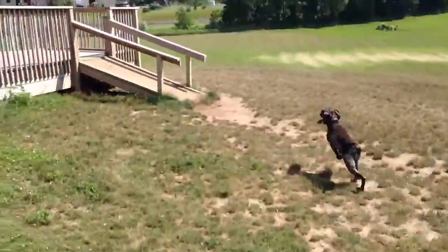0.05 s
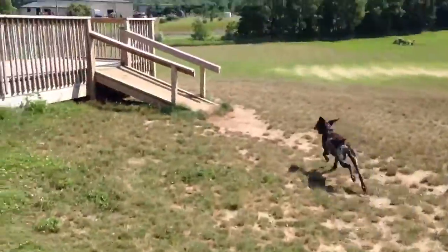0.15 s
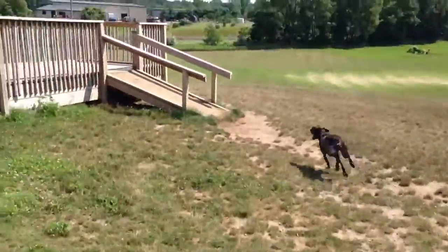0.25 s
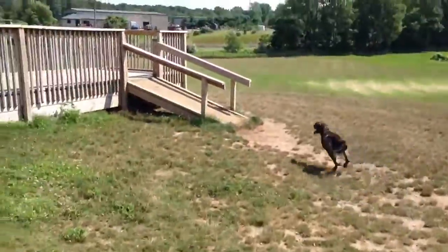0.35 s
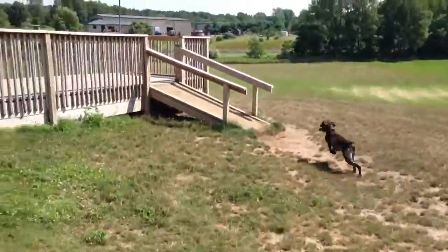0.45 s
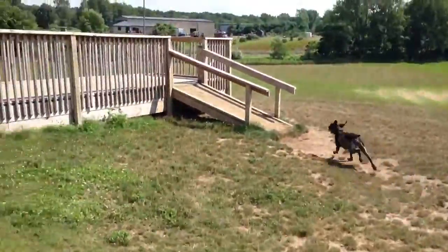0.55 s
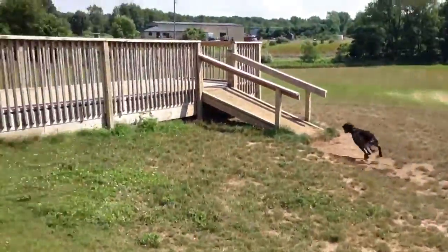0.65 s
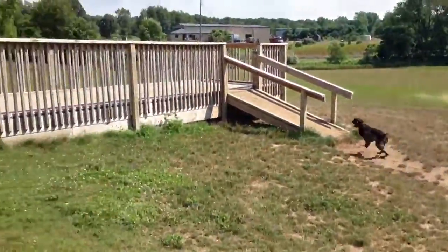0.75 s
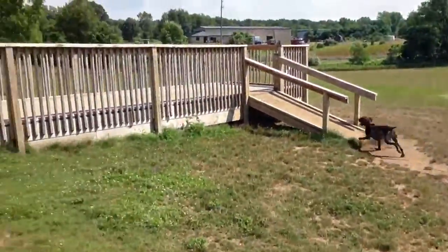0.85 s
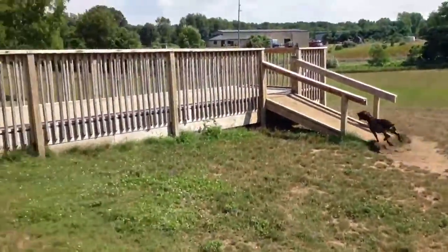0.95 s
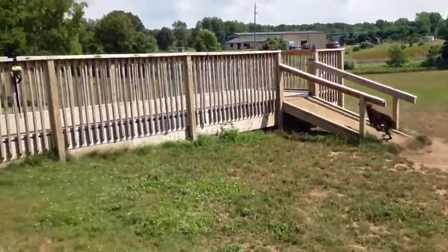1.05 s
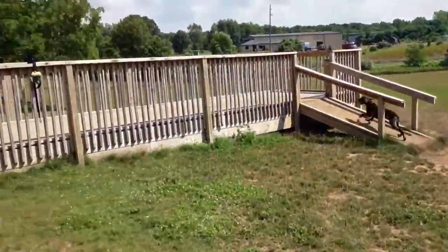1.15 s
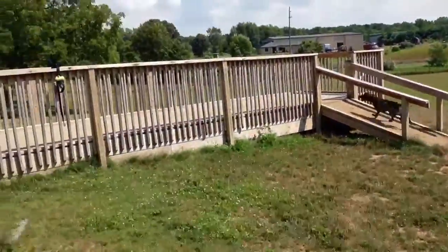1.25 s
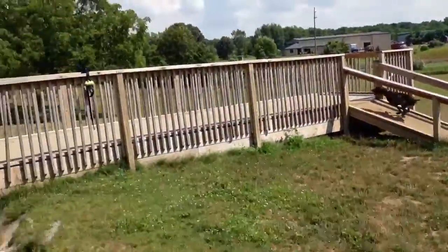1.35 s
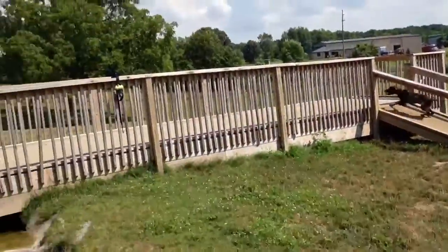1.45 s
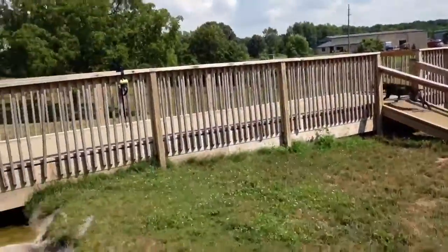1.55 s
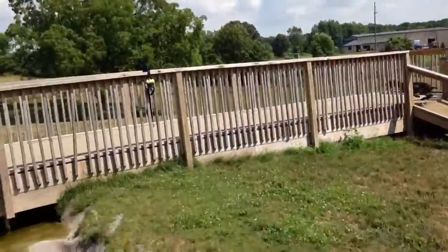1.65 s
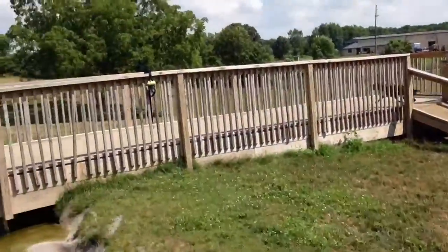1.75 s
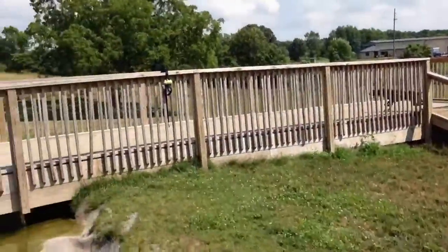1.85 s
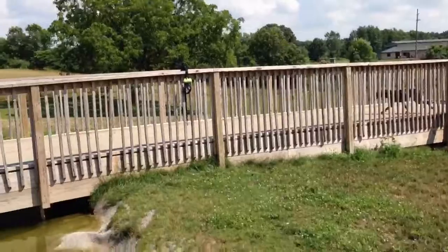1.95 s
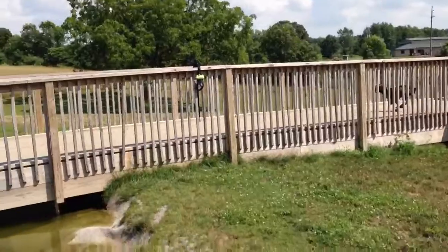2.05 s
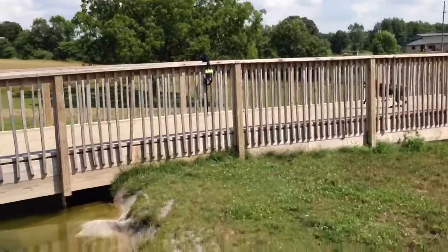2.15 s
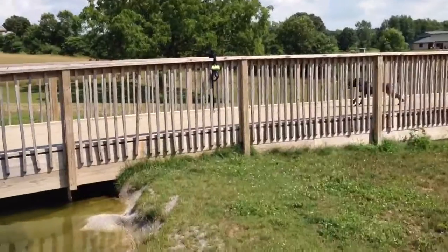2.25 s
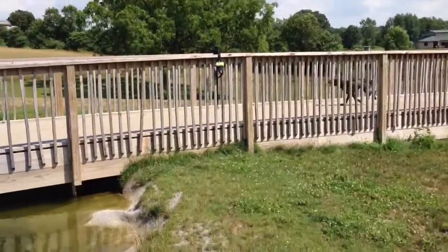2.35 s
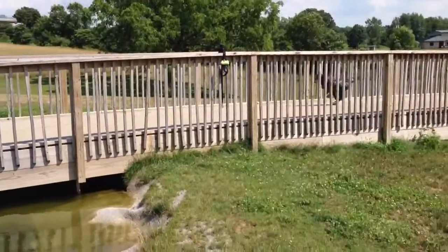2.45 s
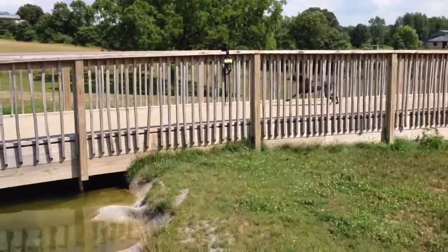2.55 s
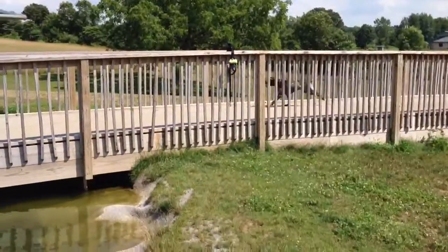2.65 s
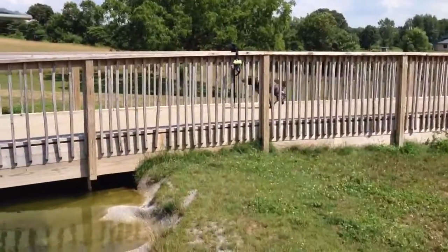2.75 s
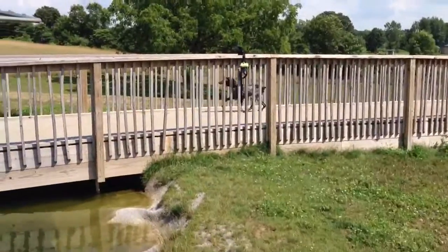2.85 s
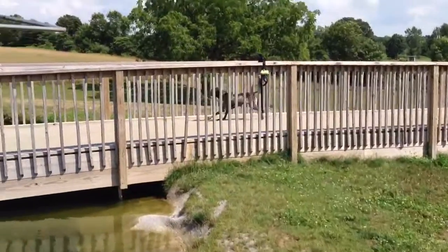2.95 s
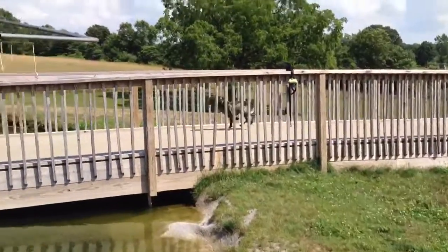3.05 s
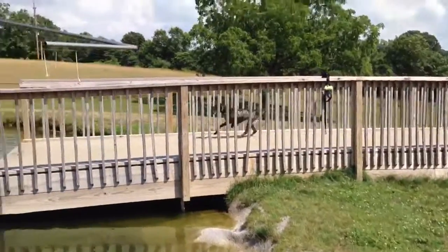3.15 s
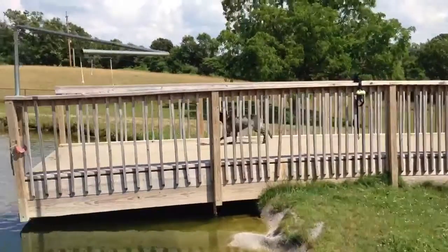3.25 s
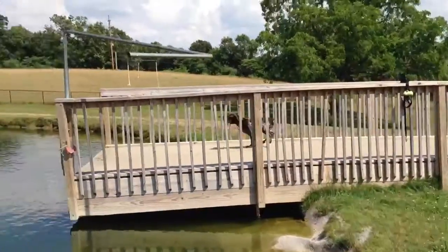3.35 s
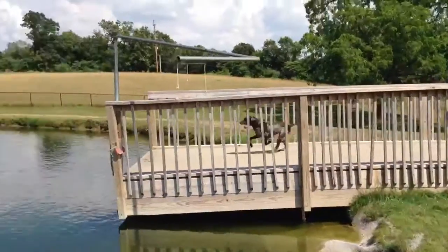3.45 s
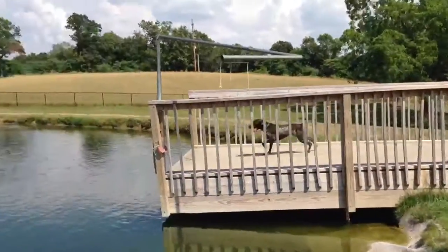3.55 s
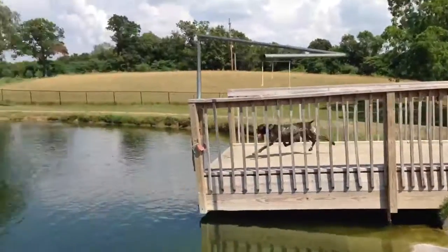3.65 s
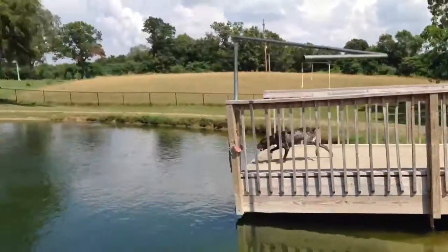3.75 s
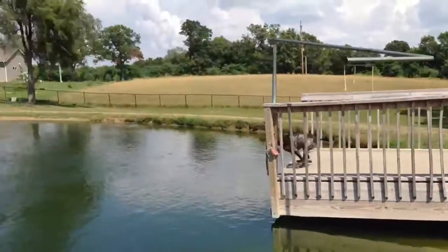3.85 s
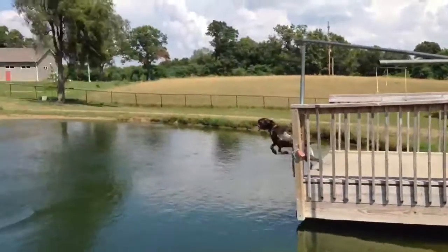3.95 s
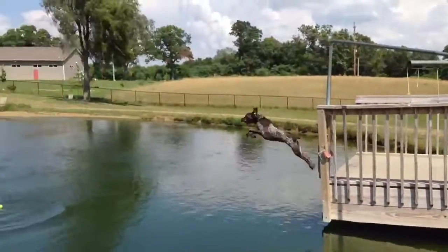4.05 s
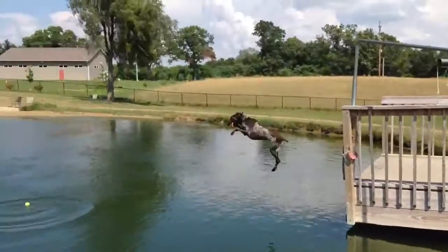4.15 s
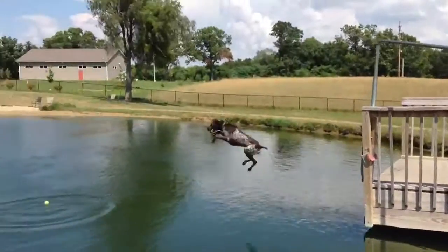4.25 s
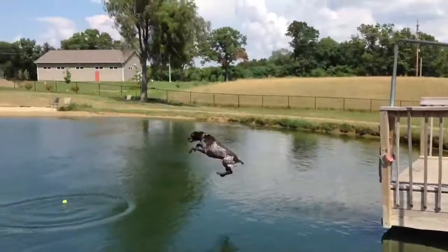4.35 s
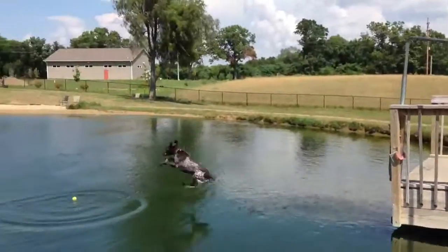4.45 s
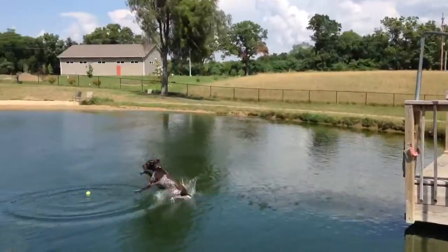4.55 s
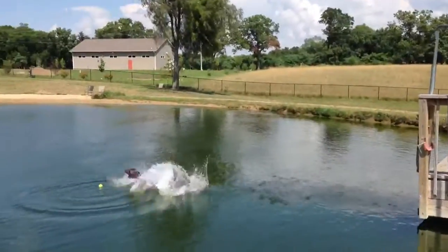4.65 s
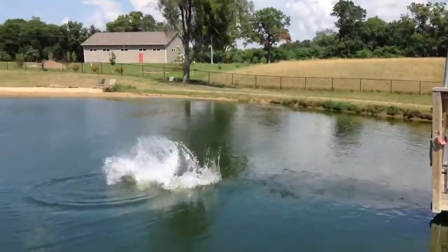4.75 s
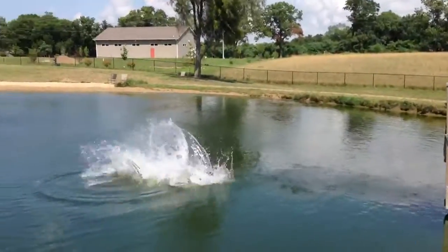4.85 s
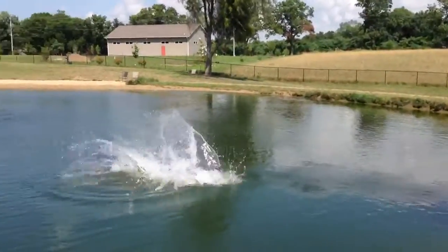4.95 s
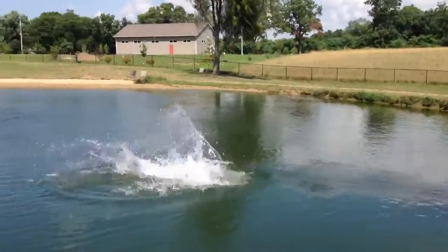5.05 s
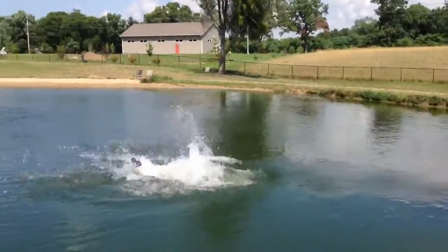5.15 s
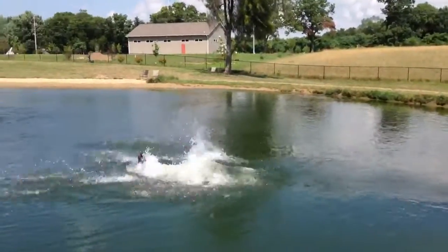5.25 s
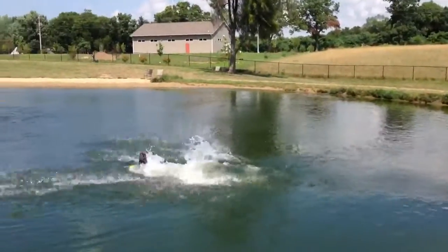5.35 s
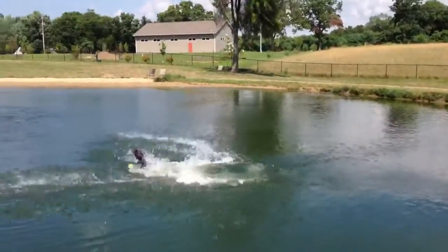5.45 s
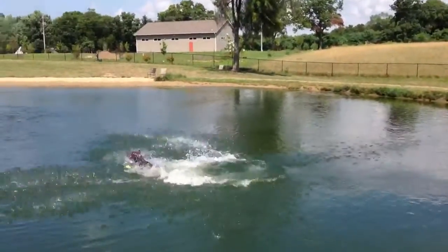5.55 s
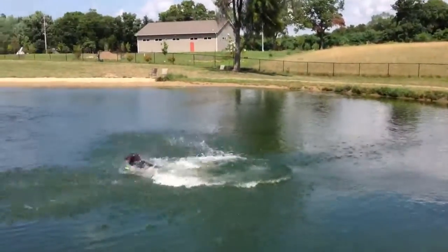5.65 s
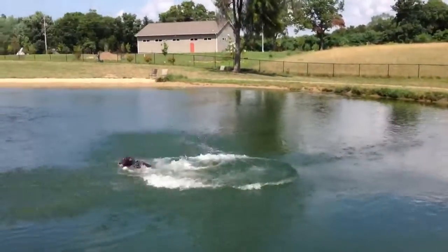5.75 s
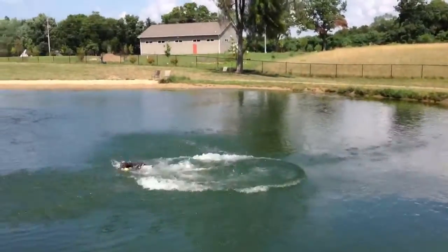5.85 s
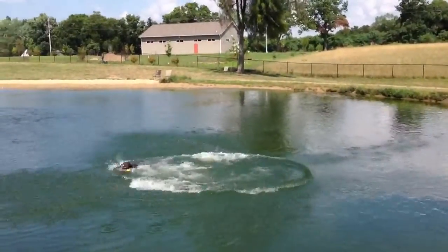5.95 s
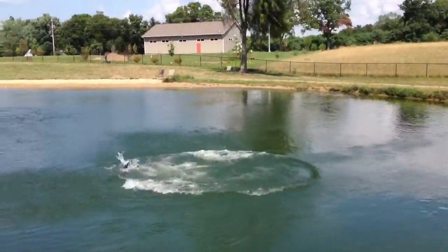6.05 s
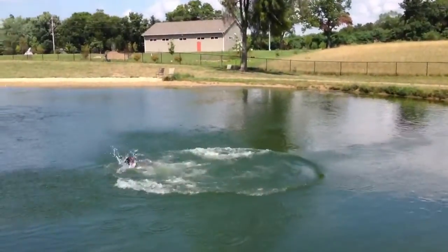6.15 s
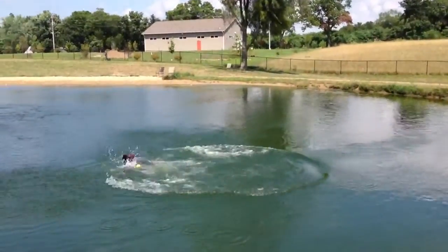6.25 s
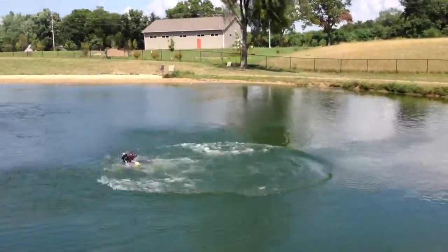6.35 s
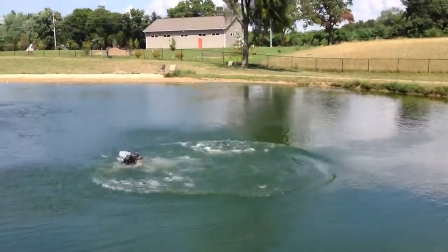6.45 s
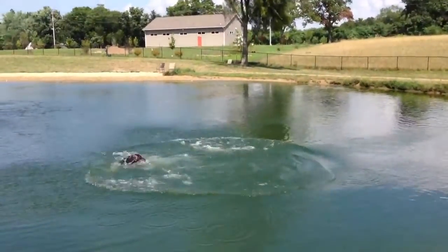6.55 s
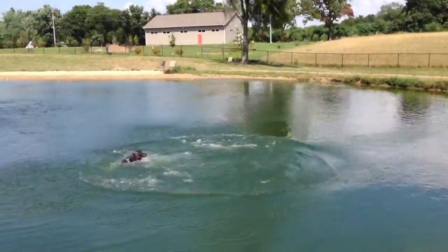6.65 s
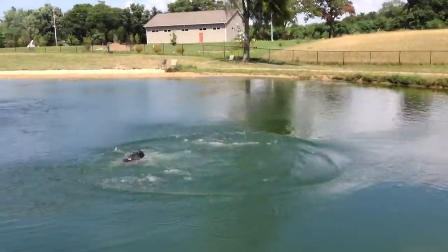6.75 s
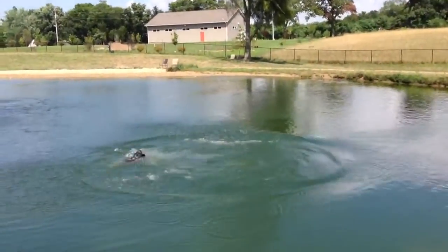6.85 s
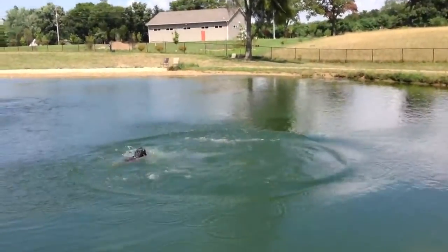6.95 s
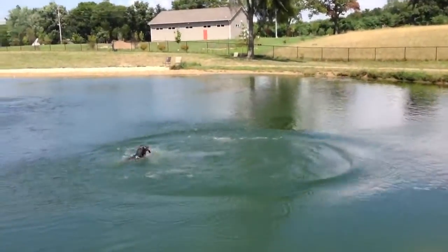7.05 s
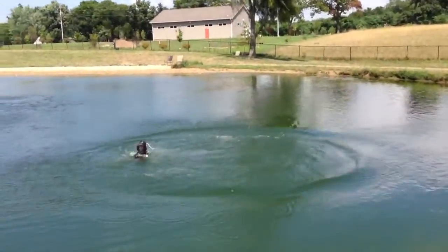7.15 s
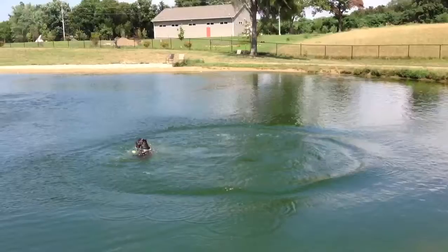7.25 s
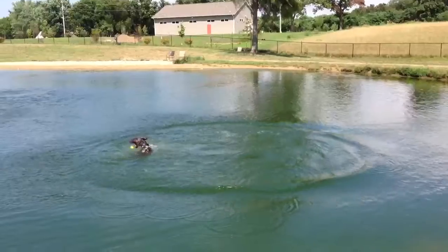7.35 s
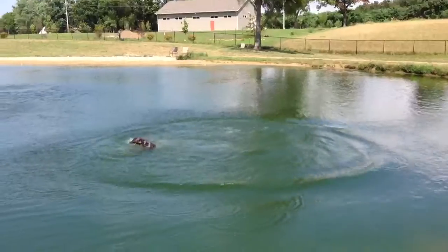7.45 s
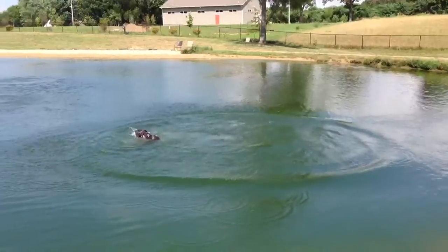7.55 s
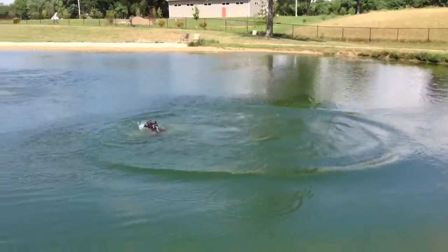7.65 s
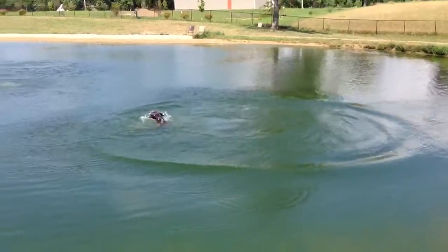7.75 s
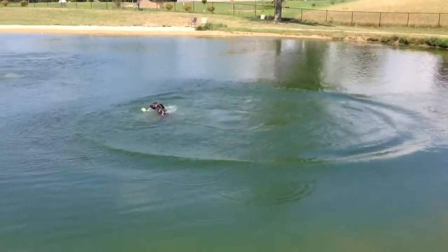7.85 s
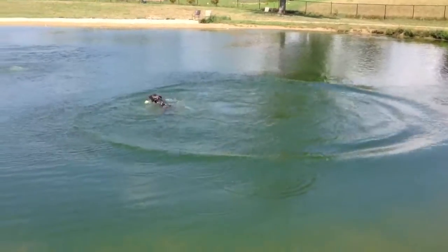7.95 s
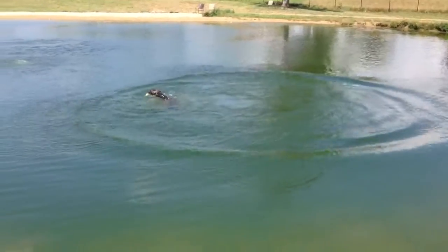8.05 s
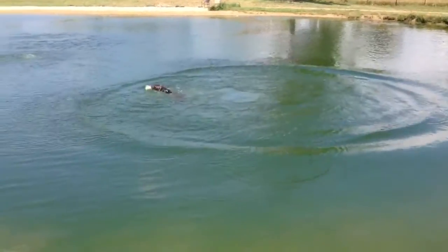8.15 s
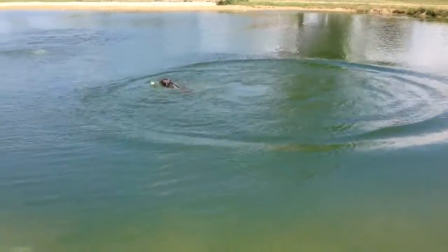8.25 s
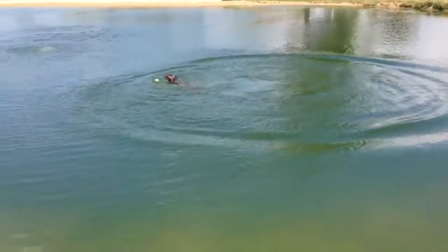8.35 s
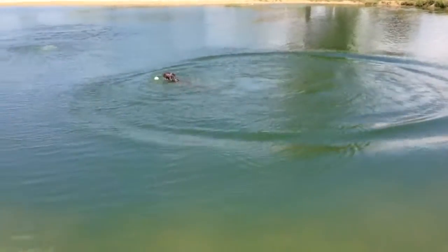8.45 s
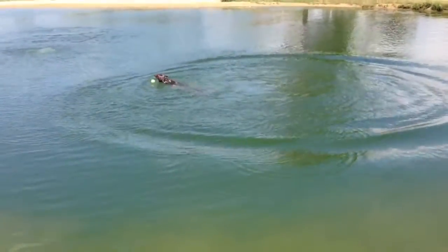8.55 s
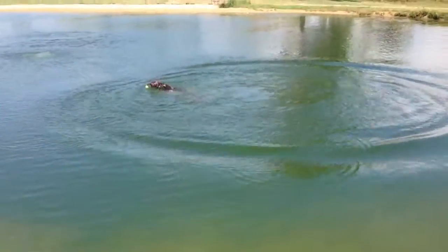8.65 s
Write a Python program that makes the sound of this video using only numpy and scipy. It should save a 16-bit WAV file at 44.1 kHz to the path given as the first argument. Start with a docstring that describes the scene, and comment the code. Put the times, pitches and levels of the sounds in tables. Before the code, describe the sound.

Quiet open country air with a very faint distant hum. From 0 s a dog gallops over dry grass: a skid of turf at the start, soft scuffs, small snapping stalks. A far bird whistles thinly in the first second and trills near 0.3, 1.4 and 2.1 s. Collar tags begin clinking around 0.75 s; from about 1.15 s paws and claws knock wooden planks, with low hollow booms and bright, irregular metal jingles, strongest around 2.3 and 3.1 s. A last push booms near 3.95 s and the tags die by 4.2 s. A brief lull, then at 4.6 s a loud splash: sharp slaps, churning, deep gulps and rising gurgles. Spray patters down until about 5.5 s, foam fizzing away afterwards. From 6 s come light paddling swishes, slaps and drips, busier around 7.5 s, with low watery gulps near 8.35 s. Small, bass-light microphone.

```python
"""Paws gallop over dry grass and a wooden dock, metal collar tags jingle, and a dog leaps into a pond with
a splash, deep gulps, falling spray and paddling. A small bird calls far off over quiet country air.
Hard things ring as short damped tones mixed with puffs of noise. Water is made of showers of tiny
bubble tones over shaped noise. The bird's notes are sine tones that glide in pitch."""
import sys
import numpy as np
from scipy import signal
from scipy.fft import rfft, irfft, next_fast_len
from scipy.io import wavfile
from scipy.ndimage import map_coordinates

SR = 44100
rng = np.random.default_rng(int(sys.argv[2]) if len(sys.argv) > 2 else 0)


def dump(signal):
    """Clip the signal to [-1, 1] and save it as 16-bit WAV at the path in sys.argv[1]."""
    limited = np.clip(np.atleast_2d(signal).T, -1, 1)
    pcm = np.round(limited * 32767).astype(np.int16)
    wavfile.write(sys.argv[1], SR, pcm)


N = 383669
TIME = np.arange(N) / SR  # seconds
AGE = np.arange(SR // 4) / SR  # seconds since a blow

# Event levels below are set before the small trims made inside each sound's function.
# In tables of tone colour, each row: frequency in Hz, relative level in dB.

# Tone colour of the open country air.
AIR = [(18, -63), (30, -19.5), (215, -1), (252, -6.5), (364, -5.5), (426, -5.5), (600, -10.5), (801, -12),
       (1040, -10.5), (2230, -34), (2980, -49), (3870, -13), (5040, -21), (14000, -18.5), (16000, -26)]
AIR_DB = -64
# A faint far hum. Each row: time in seconds, upper tone level in dB, lower tone level in dB.
DRONE = [(0, -76, -93), (1.2, -76, -93), (1.9, -85, -77), (4.2, -99, -75), (8.7, -97, -73.5)]
# How fast the hum wavers: tone colour of its fuzz.
DRONE_SWAY = [(1, -25), (10, 10), (50, -31), (200, -90)]

# Low rumble under the run. Each row: time in seconds, level in dB.
RUMBLE = [(0.0, -64), (0.48, -67), (0.86, -68), (1.15, -65), (1.34, -64.5), (1.55, -67), (2.97, -66),
          (3.38, -61), (3.95, -60), (4.32, -74)]
# The running feet. Each row: time in seconds, scuffing level in dB, grass and grit level in dB.
SCUFF = [(0.0, -65.5, -60.5), (0.43, -68, -65.5), (0.8, -68.5, -62.5), (1.55, -61, -58.5),
         (1.68, -54.5, -58), (1.89, -65, -64.5), (2.29, -65, -63.5), (2.72, -56.5, -55),
         (3.28, -62.5, -64.5), (3.81, -61, -66), (3.97, -59.5, -60), (4.16, -65, -66.5), (4.5, -64, -67)]
# Tone colours of the hollow dock, its boards, and claws or dry grass.
HOLLOW = [(50, -84), (100, -2.5), (150, 5.5), (240, 5), (400, -11), (700, -11), (1500, -45)]
BOARDS = [(150, -28), (350, -2), (900, -2), (1700, 2), (2300, -2), (3000, -14), (5000, -30)]
CLAWS = [(2000, -7), (3300, 2), (5000, -1), (8000, -7), (15000, -17)]
# Paws skid over turf and gritty planks. Each row: start in seconds, level in dB, length in seconds.
SKIDS = [(0.023, -32.5, 0.065), (0.95, -44.5, 0.061), (1.079, -45.5, 0.085), (1.14, -43.5, 0.049),
         (1.602, -46, 0.066), (2.55, -44, 0.047), (2.717, -43, 0.061), (2.764, -43, 0.076),
         (2.815, -38, 0.06)]
# Tone colour of the scraped turf and grit.
TURF = [(500, -37), (1200, -7.5), (1650, -1), (2100, -6), (2700, -4), (3200, -12), (5000, -11),
        (14000, -19)]
# Dry stalks and grit snap underfoot. Each row: start in seconds, level in dB.
SNAPS = [(0.2167, -46), (0.372, -47.5), (0.609, -44), (0.651, -48), (2.9334, -43.5)]
# Tone colour of a snap.
SNAP_COLOUR = [(1500, -3), (4000, 4), (10000, 5.0), (15000, -17)]

# The bird's slurred whistles. Each row: start in seconds, length in seconds, start pitch in Hz,
# fall in Hz, level in dB.
WHISTLES = [(0.117, .08, 4290, 470, -61), (0.258, 0.061, 4320, 420, -61), (.42, 0.095, 4240, 200, -64),
            (0.53, 0.11, 4400, 150, -69), (0.637, 0.05, 4220, 30, -61), (0.847, .08, 4400, 380, -63),
            (1.018, .09, 4000, 20, -64), (8.142, 0.03, 6460, 750, -59)]
# The bird's trills of rising notes. Each row: start in seconds, level of the middle note in dB.
TRILLS = [(.275, -64), (1.38, -57), (2.075, -53.5)]
NOTE_S, NOTE_GAP_S = .027, .022  # length of a trill note; time from one start to the next
NOTE_HZ, NOTE_RISE_HZ = 3620, 1200  # pitch where a trill note starts; how far it rises
TRILL_TAPER_DB = 3.5  # loss per note away from the middle one
ARCH_HZ = 69.6  # a bird note bends upward this much in its middle
# Tone colour of the scatter from dock, banks and trees.
BANK_COLOUR = [(100, 3.0), (1500, -7.0), (5000, -4.5), (15000, -40)]

# Collar tags collide. Each row: start in seconds, level in dB, ring of the main modes in seconds,
# high mode in Hz, its relative level in dB, low mode in Hz, its relative level in dB.
JINGLE = [(0.742, -46.5, .12, 10950, -17, 3420, -3.5), (0.84, -43.5, 0.14, 11930, 5, 3370, -1.5),
          (0.9493, -50, 0.078, 12100, -13, 3390, 3), (1.125, -49, 0.13, 12100, -18, 3420, -7),
          (1.3422, -34.5, 0.11, 12000, -6.5, 4960, -13), (1.388, -37.5, 0.053, 12000, -11, 4970, -24),
          (1.395, -31.5, 0.047, 12000, -13, 5800, -28), (1.407, -46, 0.03, 10950, -20, 5030, -28),
          (1.8057, -39.5, 0.089, 12100, -10, 5030, -19), (1.8215, -41, 0.069, 13950, -14, 3420, -19),
          (1.876, -53.5, .12, 10950, -5, 3400, -2), (2.002, -36, .1, 11100, -2, 3530, -15),
          (2.074, -45, 0.27, 12100, -20, 5010, -11), (2.119, -53, .22, 10950, -12, 5030, -22),
          (2.178, -49, .14, 10950, -20, 5030, -22), (2.3045, -25, 0.016, 14300, -11, 5800, -19),
          (2.4147, -33.5, 0.1, 14500, -10, 5010, -13), (2.48, -43.5, 0.072, 10900, -9, 4920, 5),
          (2.594, -32.5, 0.17, 10950, -21, 3480, -15), (2.789, -40, 0.089, 10950, -19, 3400, -10),
          (2.835, -39, .05, 12200, -4, 5030, -16), (2.8443, -30, 0.11, 13800, -11, 5860, -23),
          (3.084, -22, 0.082, 13600, -17, 5860, -39), (3.139, -38, .09, 12100, -8, 3490, -9.5),
          (3.1547, -34, 0.041, 10900, -15, 5860, -27), (3.445, -47, .09, 12000, -2, 5860, -8),
          (3.456, -38.5, 0.091, 13900, -4, 5100, -8.5), (3.5772, -45.5, .15, 11000, 3.5, 3480, -2.5),
          (3.785, -43.5, .2, 12100, -7, 3420, -15), (3.865, -51, 0.19, 11000, -7, 5030, -10),
          (3.899, -51, 0.14, 10950, -3, 5030, -16), (3.994, -42.5, .11, 10950, -18, 3480, -3.5),
          (4.002, -41, 0.11, 12200, -6, 5800, -10), (4.038, -45, 0.39, 12100, -10, 5030, -5),
          (4.089, -50, 0.11, 13950, -3, 5030, -10), (4.131, -42.5, 0.067, 10800, -1.5, 3420, -4),
          (4.184, -53, 0.067, 10900, -4, 5030, -18)]
# The tags' strongest bending modes, low modes and upper modes. Each row: pitch in Hz, relative level in dB.
TAG_MAIN = [(8700, -39), (8890, -1.5), (9020, -6), (9250, -14)]
TAG_LOW = [(3440, -2), (5030, 4), (5860, 3), (7220, -19)]
TAG_HIGH = [(10900, 0), (12150, -2), (13950, -3), (14700, -6)]
# Tone colour of metal clacking on metal.
CLACK = [(7000, -27), (10000, 5), (12200, 1), (13000, 2), (14500, -5), (15500, -14)]
# Tone colours of the puff around the main modes and of the lower contact tick.
TAG_PUFF = [(6500, -50), (8200, -10), (8900, -8), (9600, -32), (11000, -37)]
TAG_TICK = [(2200, -42), (3400, 24.5), (7000, 31.5), (9000, -43)]
TAG_PAIR_HZ = 160  # the second tag rings this much higher than the first
CLINK_DB, CLACK_GROWS = -41, 0.19  # an ordinary clink; extra clack for a harder blow, in dB per dB
RUN_S = (.7, 4.2)  # the tags swing between these times, in seconds

# Paws and claws strike the boards. Each row: start in seconds, level in dB, ring pitch in Hz,
# relative claw level in dB.
PAWS = [(1.164, -46, 395, -11), (1.221, -45.5, 680, -8), (1.28, -49, 2150, -17), (1.478, -44, 1280, -14),
        (1.537, -46.5, 1230, -11), (1.707, -43, 1210, -9.5), (1.747, -44.5, 1210, -10),
        (1.818, -47.5, 1540, -4), (2.199, -37, 2290, -1), (2.392, -51.5, 2690, 0), (2.483, -53.5, 2450, 5),
        (2.507, -48.5, 524, -24), (2.579, -46, 2390, -20), (2.6785, -35.5, 1677, -18),
        (2.734, -47, 1010, -9), (2.887, -39.5, 1565, -19), (2.942, -46, 1390, -14), (2.999, -41, 1980, -31),
        (3.193, -49.5, 1300, -7), (3.253, -44.5, 1900, -22), (3.282, -49, 930, -20), (3.359, -47, 437, -10),
        (3.503, -41.5, 1610, -13), (3.765, -37.5, 523, -24), (3.79, -46, 546, -12), (3.854, -42, 660, -11),
        (3.865, -38, 2260, 0.5), (3.897, -44, 530, -8), (4.149, -48, 443, -10)]
# The dock booms under the dog's weight. Each row: start in seconds, level in dB, pitch in Hz.
BOOMS = [(1.165, -42.5, 185), (1.228, -52.5, 328), (1.491, -51.5, 232), (1.794, -51, 230),
         (2.996, -45.5, 144), (3.186, -47, 143), (3.503, -52, 172), (3.602, -56, 197), (3.941, -39, 167)]

# Legs, chest and paddling paws slap the water. Each row: start in seconds, level in dB,
# bubble pitch in Hz, relative spatter level in dB.
SLAPS = [(4.582, -22.5, 1560, -4.5), (4.606, -34, 900, 1), (4.613, -17.5, 1640, -4.5),
         (4.628, -17.5, 1760, -5), (4.634, -18.5, 424, -1), (4.648, -20, 777, 1), (4.67, -24.5, 600, 3),
         (4.681, -17.5, 1420, -8), (4.682, -23, 705, -16), (4.71, -30, 420, -15), (4.718, -18, 830, 1),
         (4.734, -27, 452, -8), (4.757, -19.5, 600, -19), (5.613, -31.5, 452, -18), (6, -32, 616, -21),
         (6.072, -29.5, 1536, -1.5), (6.081, -34.5, 1510, 2.5), (6.229, -37, 676, -30),
         (6.571, -36, 1470, -10), (6.593, -38.5, 460, 1), (6.854, -37, 530, -15), (6.923, -38.5, 825, -3),
         (7.381, -43, 890, -9), (7.412, -40, 2080, -20), (7.494, -27.5, 1740, -12),
         (7.507, -37.5, 1640, 0.5), (7.533, -34, 2080, -1.5), (7.592, -39, 980, -23),
         (7.644, -35.5, 387, -30), (7.682, -33.5, 900, -26), (7.693, -31.5, 1285, -14.5),
         (7.842, -42, 1200, -1.5), (7.89, -42.5, 660, 2), (7.993, -43, 1620, -3)]
# Tone colours of water bubbles, fine droplets, and bigger drops hitting the surface.
BUBBLES = [(190, -22.5), (330, -7), (470, -2), (677, -0.5), (721, -0.5), (931, -2.5), (1140, 1),
           (1350, -0.5), (1730, -1.5), (2020, -2), (2900, -8.5), (3770, -10), (6380, -120)]
DROPLETS = [(1710, -18.5), (2900, -14), (3110, -1.5), (3590, 0), (6410, -5), (6930, -6.5), (14100, -12.5),
            (15000, -17), (15700, -16), (16000, -48)]
IMPACTS = [(500, -11), (1900, 5), (2850, -3.5), (3600, -2.5), (15000, -8.5)]

ENTRY_S = 4.605  # the dog's chest meets the water
# Stages of the splash. Each: delay after entry in seconds, attack in seconds, hold in seconds,
# release in dB per second.
SHEET = (0, .03, .1, 70)  # the body tears up a sheet of water
PLUNGE = (.015, .02, .1, 150)  # the body ploughs under and churns the surface
GURGLE = (0.108, 0.032, 0.35, 120)  # the cavity boils shut
FALLBACK = (.15, .32, .35, 55)  # the thrown water rains down
FOAM = (0.16, 0.59, 0.38, 11.24)  # the foam patch fizzes out
THROB = (0.2, 0.037, 0.11, 150)  # the largest pockets break up
RIPPLES = (2.58, 0.29, 0.2, 3.2)  # the dog swims on
# Levels of four stages. Each: bubbles in dB, droplets in dB.
SHEET_DB = (-33.5, -35)
FALLBACK_DB = (-38, -38.5)
FOAM_DB = (-45, -47.5)
RIPPLES_DB = (-58.5, -63)
DROPLET_LAG_S = 0.065  # fine droplets fly higher and land later
PLUNGE_DB, GURGLE_DB, THROB_DB = -40, -38, -40  # levels of the churn, the small and the large bubbles
# The cavity's bubbles divide and climb in pitch over this time, by this much.
BREAKUP_S, BREAKUP_OCTAVES = 0.505, 1.12
# Tone colours of the churned surface, the gurgle, and the large air pockets.
CHURN = [(200, -7), (350, -7), (800, -11), (1200, -3), (1900, 10), (3000, -7), (6000, -40)]
GURGLE_COLOUR = [(150, -9), (330, 0.5), (500, -2.5), (750, -7.0), (1400, -9)]
POCKETS = [(70, -34), (110, -3), (160, 7.5), (280, 1.5), (420, -9), (700, -25), (1500, -69)]
# Big air pockets pinch off. Each row: start in seconds, level in dB, pitch in Hz.
GULPS = [(4.717, -22.5, 293), (4.73, -19.5, 186), (4.764, -19, 166), (4.806, -30, 365), (4.811, -23.5, 233),
         (4.827, -28, 284), (4.851, -31, 166), (4.882, -33, 190), (4.943, -36, 175), (4.975, -34, 175),
         (5.382, -30.5, 186), (5.576, -32, 151), (6.855, -43.5, 270), (7.506, -38.5, 163),
         (8.239, -41, 224), (8.331, -42.5, 392), (8.35, -26, 300), (8.351, -25, 174), (8.382, -25.5, 189),
         (8.396, -38, 200), (8.408, -37, 288)]
# Clumps of thrown water break on the pond. Each row: start in seconds, level in dB.
CLUMPS = [(4.831, -29.5), (5.014, -41), (5.119, -28.5), (5.35, -31.5), (5.436, -32.5), (5.46, -37)]
# Single fat drops plink. Each row: start in seconds, level in dB, pitch in Hz.
DRIPS = [(5.8435, -27.5, 4070), (6.781, -42, 1250), (6.856, -37.5, 1000), (6.9045, -45, 1180),
         (7.459, -32, 2220), (7.8263, -55, 1170), (8.067, -43.5, 5480), (8.212, -42, 2170)]
# Swimming strokes sweep water aside. Each row: start in seconds, level in dB, from pitch in Hz,
# to pitch in Hz.
STROKES = [(6.165, -44.5, 478, 748), (6.555, -40.5, 1103, 1480), (7.378, -45, 955, 413),
           (7.404, -43, 1302, 1950), (7.473, -43, 1190, 600), (7.65, -43, 397, 1300),
           (7.755, -45, 896, 2010), (7.835, -43.5, 2200, 1480), (7.875, -45.5, 528, 471),
           (8.13, -46, 700, 1010)]
STROKE_S = .075  # time for that glide
# Tone colour of a stroke's swish.
SWISH = [(250, -11), (450, 1.5), (1600, 4.0), (3000, 2.5), (6000, -6.0), (15000, -29)]
TOP_HZ = 15500  # nothing is kept from here up


def amp(db):
    """Decibels to gain."""
    return 10 ** (np.asarray(db) / 20)


def unit(x):
    """Scale to an average (rms) strength of 1."""
    return x / np.sqrt(np.mean(x ** 2) + 1e-20)


def crest(x):
    """Scale to peak 1."""
    return x / (np.abs(x).max() + 1e-20)


def add(track, s, sound):
    """Mix a sound into a track at time s."""
    room = track[max(round(s * SR), 0):][:len(sound)]
    room += sound[:len(room)]


def gains(rows, fade=.02):
    """A gain per sample for each dB column, fading out beyond the rows."""
    s, *cols = np.transpose(rows)
    gate = np.clip(1 + np.minimum(TIME - s[0], s[-1] - TIME) / fade, 0, 1)
    return [gate * amp(np.interp(TIME, s, c)) for c in cols]


def colour(x, spectrum):
    """Shape the tone of x by (Hz, dB) points; rms 1."""
    size = next_fast_len(len(x) + 4096)
    hz, db = np.transpose(spectrum)
    log_hz = np.log(np.fft.rfftfreq(size, 1 / SR) + 1)
    gain = amp(np.interp(log_hz, np.log(hz), db))
    return unit(irfft(rfft(x, size) * gain, size)[:len(x)])


def noise(spectrum, size=N):
    """Coloured noise of rms 1."""
    return colour(rng.standard_normal(size), spectrum)


def low_cut(x, hz, order=2):
    """Remove the bass below hz (a high-pass filter)."""
    return signal.sosfilt(signal.butter(order, hz, "high", fs=SR, output="sos"), x)


def flutter(rate, depth_db):
    """A smooth random gain, with rate random points a second."""
    knots = rng.standard_normal(4096)
    return amp(depth_db * map_coordinates(knots, [TIME * rate], mode="wrap"))


def blow(attack, t60):
    """An envelope that swells, then falls 60 dB in t60 seconds."""
    return (1 - np.exp(-(AGE / attack) ** 2)) * amp(-60 * AGE / t60)


def burst(spectrum, attack, t60):
    """A short puff of coloured noise, peak 1."""
    return crest(noise(spectrum, size=len(AGE)) * blow(attack, t60))


def ping(hz, attack, t60, rise=0):
    """One damped resonance, peak 1; a bubble's pitch rises as it nears the surface."""
    pitch = hz * (1 + rise * np.minimum(AGE / t60, 1))
    turns = np.cumsum(pitch) / SR + rng.random()
    return crest(np.sin(2 * np.pi * turns) * blow(attack, t60))


def around(hz, skirt_db):
    """A broad resonance as (Hz, dB) points, falling away on both sides of hz."""
    return [(hz / 4, -2.5 * skirt_db), (hz / 2, -skirt_db), (hz / 1.15, 0),
            (hz * 1.15, 0), (hz * 2, -skirt_db), (hz * 4, -2.5 * skirt_db)]


def grains(count, lo_hz, hi_hz, cycles, spread_db, size, octaves=0):
    """A shower of tiny damped tones, random in pitch and strength, rms 1; later ones may start higher."""
    when, pitch, strength, life = rng.random((count, 4)).T[:, :, None]
    hz = lo_hz * (hi_hz / lo_hz) ** pitch
    weight = amp(-spread_db * np.log(1 - .99 * strength)) * hz / hi_hz
    # the climb depends on how long after the entry each grain is born
    breakup = np.clip((when * N / SR - ENTRY_S) / BREAKUP_S, 0, 1)
    turns = hz * 2 ** (octaves * breakup ** 2) * np.arange(size) / SR
    age = turns / (cycles * (.5 + life))
    waves = weight * np.sin(2 * np.pi * turns * (1 + age / 10)) * amp(-60 * age)
    waves = waves * np.minimum(np.linspace(4, 0, size), 1)  # soft ending
    index = (when * N).astype(int) + np.arange(size)
    return unit(np.bincount(index.ravel(), waves.ravel(), N + size)[:N])


def air():
    """Quiet country air: coloured noise whose level drifts gently."""
    return amp(AIR_DB) * noise(AIR) * flutter(4, 1.0)


def drone(upper_hz=828, lower_hz=436):
    """A faint, fuzzy hum from far away: two tones blurred by slow noise, wavering on the breeze."""
    out = np.zeros(N)
    for gain, hz in zip(gains(DRONE), (upper_hz, lower_hz)):
        fuzz = noise(DRONE_SWAY) + 1j * noise(DRONE_SWAY)
        out += gain * unit(np.real(fuzz * np.exp(2j * np.pi * hz * TIME)))
    return out * flutter(7, 1.2)


def gallop():
    """Under the separate footfalls, noise rumbles and scuffs while showers of grains patter and crackle."""
    rumble, = gains(RUMBLE, fade=0.16)
    scuff, grass = gains(SCUFF, fade=0.94)
    crackle = grains(count=9000, lo_hz=2500, hi_hz=14000, cycles=4, spread_db=3.8, size=64)
    patter = grains(count=4000, lo_hz=400, hi_hz=3200, cycles=12, spread_db=2.6, size=512)
    low = amp(0.5) * rumble * noise(HOLLOW) * flutter(14, 2.8)
    pads = amp(-6.5) * noise(BOARDS) + amp(-4.5) * colour(patter, BOARDS)
    stalks = amp(-3.5) * noise(CLAWS) + amp(-5.5) * colour(crackle, CLAWS)
    return low + scuff * pads * flutter(35, 1.6) + grass * stalks


def skids():
    """Pads scrape over grass and grit: a shower of grains swells and fades with the pressure."""
    out = np.zeros(N)
    grit = grains(count=16000, lo_hz=900, hi_hz=9000, cycles=6, spread_db=2, size=192)
    for s, db, length in SKIDS:
        pressure = np.sin(np.pi * np.minimum(AGE / length, 1)) ** 2
        scrape = colour(grit[round(s * SR):][:len(AGE)], TURF)
        add(out, s, amp(db) * crest(pressure * scrape))
    return out


def snaps():
    """Single stalks break, each with a sharp puff of noise."""
    out = np.zeros(N)
    for s, db in SNAPS:
        add(out, s, amp(db) * burst(SNAP_COLOUR, 0.00044, 0.056))
    return out


def banks(x, t60=0.11):
    """A dull scatter from dock, banks and trees: the sound smeared by a short tail of noise."""
    tail = noise(BANK_COLOUR, size=len(AGE)) * blow(0.0068, t60)
    return signal.fftconvolve(x, tail / np.linalg.norm(tail))[:N]


def chirp(length, hz, glide_hz):
    """One arched, gliding, unsteady bird note."""
    u = np.minimum(AGE / length, 1)
    arch = np.sin(np.pi * u)
    waver = 22 * noise([(1, 0), (120, 0), (400, -40)], size=len(AGE))  # Hz
    pitch = hz + glide_hz * u + ARCH_HZ * arch + waver
    return arch * np.sin(2 * np.pi * np.cumsum(pitch) / SR)


def whistles():
    """Thin whistles, each a tone gliding down in pitch."""
    out = np.zeros(N)
    for s, length, hz, fall_hz, db in WHISTLES:
        add(out, s, amp(db) * chirp(length, hz, -fall_hz))
    return out


def trills(count=5):
    """Quick runs of overlapping rising notes, loudest in the middle."""
    out = np.zeros(N)
    for s, db in TRILLS:
        for k in range(count):
            note_db = db - TRILL_TAPER_DB * abs(k - count // 2)
            add(out, s + k * NOTE_GAP_S, amp(note_db) * chirp(NOTE_S, NOTE_HZ, NOTE_RISE_HZ))
    return out


def bird():
    """A far bird: whistles and trills, both with a scattered echo."""
    falling, rising = whistles(), trills()
    return falling + rising + banks(amp(-7) * falling + amp(-13) * rising, t60=.4)


def ring(modes, t60, scatter_db=3, detune=0.0071):
    """Metal modes struck at new strengths; the tags' touch shifts their pitches slightly."""
    tones = []
    for hz, db in modes:
        gain = amp(db + scatter_db * rng.normal())
        tones.append(gain * ping(hz * (1 + detune * rng.normal()), 0.00041, t60))
    return crest(sum(tones))


def rattle(count=22, db=-55):
    """The swinging tags brush each other lightly at random times, ringing faintly."""
    out = np.zeros(N)
    for s, change_db in zip(rng.uniform(*RUN_S, count), rng.normal(0, 2.2, count)):
        brush = ring(TAG_MAIN, .1, detune=.012) + amp(-6) * ring(TAG_HIGH, .1, scatter_db=5)
        add(out, s, amp(db + change_db) * brush)
    return out


def tags():
    """Each collision is a clack and a thin ring; where the tags touch decides which modes sing and how long."""
    out = np.zeros(N)
    for s, db, t60, high_hz, high_db, low_hz, low_db in JINGLE:
        main = ring(TAG_MAIN, t60, scatter_db=4.5, detune=0.008)
        main += amp(-8.5) * burst(TAG_PUFF, 0.0022, 0.073)
        pair = [(high_hz, 0), (high_hz + TAG_PAIR_HZ, -6)]
        high = amp(-1.5) * ring(pair, .08)
        high += amp(-2.5) * ring(TAG_HIGH, 0.075, scatter_db=4, detune=0.009)
        clack = amp(1.0 + CLACK_GROWS * (db - CLINK_DB)) * burst(CLACK, 0.0007, 0.06)
        low = amp(-4) * ping(low_hz, .0003, .085)
        low += amp(-4) * ring(TAG_LOW, 0.075, scatter_db=5, detune=0.009)
        tick = amp(-13.5) * burst(TAG_TICK, 0.00035, 0.051)
        add(out, s, amp(db) * (main + amp(high_db) * (high + clack) + amp(low_db) * low + tick))
        # the tags rebound and rattle against each other a moment later
        for lag, loss_db in zip(np.cumsum(rng.uniform(0.004, .011, size=2)), (5, 9)):
            touch = ring(TAG_MAIN, 0.028, scatter_db=10, detune=0.025)
            touch += amp(high_db) * burst(CLACK, .0003, .025)
            add(out, s + lag, amp(db - loss_db) * touch)
    return out


def paws():
    """Pads knock the planks into a short ring, and claws scratch them with bright noise."""
    out = np.zeros(N)
    for s, db, hz, claw_db in PAWS:
        knock = amp(-2.5) * burst(BOARDS, 0.0012, 0.059)
        knock += amp(-4.0) * burst(around(hz, skirt_db=18.5), 0.0033, 0.046)
        knock += amp(-3.5) * ping(hz, 0.0022, 0.039)
        scratch = amp(claw_db + 10.0) * burst(CLAWS, 0.00029, 0.043)
        add(out, s, amp(db) * (knock + scratch))
    return out


def booms():
    """The dock's frame booms below: a low damped tone with hollow noise."""
    out = np.zeros(N)
    for s, db, hz in BOOMS:
        boom = amp(4.5) * ping(hz, 0.0036, 0.076) + amp(-5.0) * burst(HOLLOW, 0.00073, 0.096)
        add(out, s, amp(db) * boom)
    return out


def slaps():
    """Each slap cracks the surface, traps a cluster of bubbles and throws fine spatter."""
    out = np.zeros(N)
    for s, db, hz, spatter_db in SLAPS:
        smack = amp(-7.5) * burst(BUBBLES, 0.0028, 0.035)
        smack += amp(-5) * burst(around(hz, skirt_db=16), 0.0032, 0.03)
        smack += amp(-11.5) * ping(hz, 0.0025, 0.03, rise=0.16)
        spatter = amp(spatter_db - 0.5) * burst(DROPLETS, 0.0018, 0.05)
        add(out, s, amp(db) * (smack + spatter))
    return out


def swell(stage, lag=0):
    """Gain of one stage of the splash: attack, hold, then a steady fall in dB."""
    delay, attack, hold, release = stage
    age = TIME - ENTRY_S - delay - lag
    rise = np.sin(np.pi / 2 * np.clip(age / attack, 0, 1)) ** 2
    return rise * amp(-release * np.maximum(age - attack - hold, 0))


def wake():
    """Gains of the bubbles and the droplets in the foam and in the swimmer's ripples."""
    return [np.hypot(amp(foam_db) * swell(FOAM), amp(ripples_db) * swell(RIPPLES))
            for foam_db, ripples_db in zip(FOAM_DB, RIPPLES_DB)]


def spray():
    """Water flies up and falls back, ringing small bubbles over a wash; droplets and foam fizz above."""
    layers = []
    for sheet_db, fall_db, lag, foam in zip(SHEET_DB, FALLBACK_DB, (0, DROPLET_LAG_S), wake()):
        stages = [amp(sheet_db) * swell(SHEET), amp(fall_db) * swell(FALLBACK, lag), foam]
        layers.append(np.linalg.norm(stages, axis=0))  # the stages' powers add up
    bubbles, droplets = layers
    plinks = grains(count=6000, lo_hz=420, hi_hz=3047, cycles=26, spread_db=2, size=800)
    fizz = grains(count=20000, lo_hz=2980, hi_hz=13900, cycles=3.9, spread_db=2.5, size=96)
    body = amp(-4.5) * colour(plinks, BUBBLES) + amp(-6.5) * noise(BUBBLES)
    top = amp(-8) * colour(fizz, DROPLETS) + amp(-4) * noise(DROPLETS)
    # the bigger drops strike the surface as separate sharp ticks
    ticks = grains(count=4500, lo_hz=900, hi_hz=8000, cycles=3.5, spread_db=2.4, size=128)
    tick_gain = np.hypot(amp(FALLBACK_DB[1]) * swell(FALLBACK), amp(FOAM_DB[1]) * swell(FOAM))
    crackle = amp(-7) * tick_gain * colour(ticks, IMPACTS)
    wash = bubbles * body * flutter(40, 0.77) + droplets * top * flutter(39, 0.43)
    return (wash + crackle) * flutter(32, 1.0)


def plunge():
    """The body churns the water into a brief shower of bubble tones."""
    churn = grains(count=7000, lo_hz=304, hi_hz=2430, cycles=15, spread_db=2.0, size=700)
    return amp(PLUNGE_DB) * swell(PLUNGE) * colour(churn, CHURN)


def gurgle():
    """Large air pockets break up into smaller bubbles, whose tones climb in pitch."""
    boil = grains(count=2600, lo_hz=141, hi_hz=396, cycles=10, spread_db=1.2, size=2400)
    babble = grains(count=5000, lo_hz=220, hi_hz=700, cycles=14, spread_db=.8, size=1800,
                    octaves=BREAKUP_OCTAVES)
    large = amp(THROB_DB) * swell(THROB) * colour(boil, POCKETS)
    small = amp(GURGLE_DB) * swell(GURGLE) * colour(babble, GURGLE_COLOUR)
    return large + small


def gulps():
    """Each big air pocket throbs for a few cycles with its pitch rising, over a puff of low noise."""
    out = np.zeros(N)
    for s, db, hz in GULPS:
        throb = amp(-0.5) * ping(hz, 0.0019, 0.033, rise=0.07)
        add(out, s, amp(db) * (throb + amp(-8.0) * burst(POCKETS, 0.0047, 0.073)))
    return out


def cavity():
    """The hole in the water churns, gurgles and gulps, with its deepest bass removed."""
    return low_cut(plunge() + gurgle() + gulps(), hz=133, order=4)


def clumps():
    """Heavier lumps of spray land with a short, coarse splatter of noise."""
    out = np.zeros(N)
    for s, db in CLUMPS:
        splatter = burst(BUBBLES, 0.0097, 0.13) + amp(-2.0) * burst(DROPLETS, 0.0099, 0.26)
        add(out, s, amp(db) * splatter)
    return out * flutter(220, 2.0)


def drips():
    """Stray fat drops plink: a very short rising bubble tone inside a puff of noise."""
    out = np.zeros(N)
    for s, db, hz in DRIPS:
        plink = amp(-6) * ping(hz, 0.0005, 0.01, rise=0.2)
        add(out, s, amp(db) * (plink + amp(-2) * burst(around(hz, skirt_db=20), 0.0005, 0.018)))
    return out


def swirl(from_hz, to_hz, width_hz=130):
    """Water rushing through a hollow that opens or closes: a narrow, gliding band of noise, peak 1."""
    u = np.minimum(AGE / STROKE_S, 1)
    band = [(1, 0), (width_hz, 0), (width_hz * 8, -50)]
    rush = noise(band, size=len(AGE)) + 1j * noise(band, size=len(AGE))
    turns = np.cumsum(from_hz * (to_hz / from_hz) ** u) / SR
    return crest(np.sin(np.pi * u) * np.real(rush * np.exp(2j * np.pi * turns)))


def paddling():
    """Each stroke swishes around a gliding hollow behind the paw; bubbles pop in the foam and wake."""
    out = np.zeros(N)
    for s, db, from_hz, to_hz in STROKES:
        swish = burst(SWISH, 0.038, 0.22)
        add(out, s, amp(db) * (amp(-3.5) * swish + amp(-7.0) * swirl(from_hz, to_hz)))
    plops = grains(count=1400, lo_hz=450, hi_hz=2200, cycles=30, spread_db=1.7, size=1600)
    ticks = grains(count=1500, lo_hz=2460, hi_hz=11100, cycles=9, spread_db=2.4, size=128)
    bubbles, droplets = wake()
    pops = amp(-7.3) * bubbles * colour(plops, BUBBLES)
    pops += amp(-7.5) * droplets * colour(ticks, DROPLETS)
    return out + pops * flutter(16, 2)


def scene():
    """Dog, water, bird and a far hum in open air; the separate hits also scatter off the surroundings."""
    run = skids() + snaps() + rattle() + tags() + paws() + booms()
    hits = run + slaps() + drips() + paddling()
    background = air() + drone() + bird()
    splash = spray() + cavity() + clumps()
    return (hits + amp(-15.0) * banks(hits) + gallop() + splash + background)[None]


def record(dry, bass_hz=75):
    """The small microphone sheds deep bass and keeps nothing above its band limit."""
    size = next_fast_len(N + SR // 2)
    keep = np.fft.rfftfreq(size, 1 / SR) < TOP_HZ
    return irfft(rfft(low_cut(dry, bass_hz), size) * keep, size)[:, :N]


dry = scene()
out = record(dry)
dump(out)
```